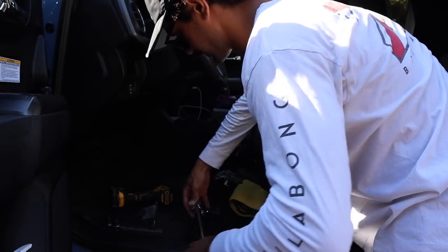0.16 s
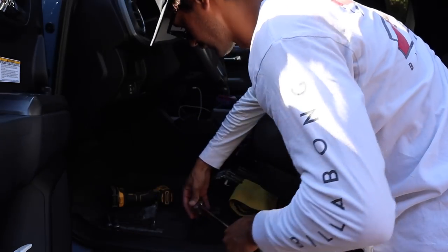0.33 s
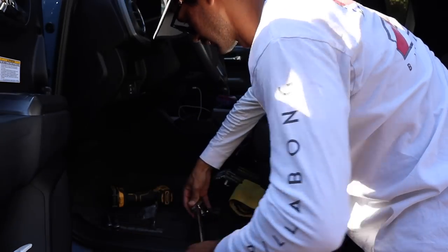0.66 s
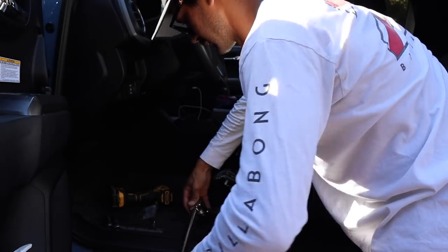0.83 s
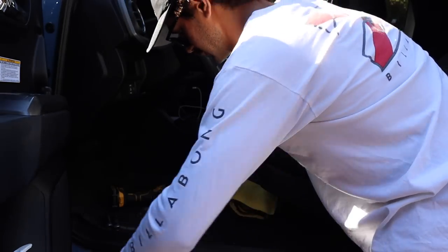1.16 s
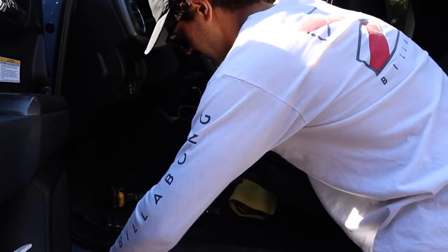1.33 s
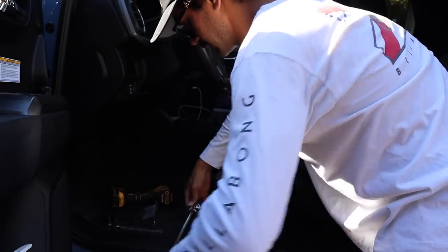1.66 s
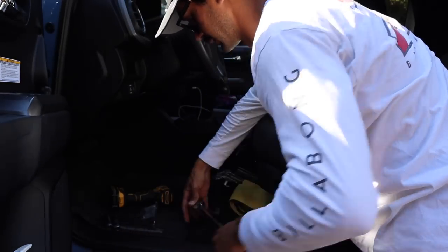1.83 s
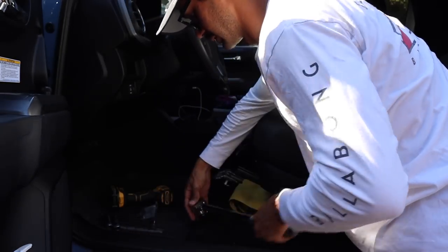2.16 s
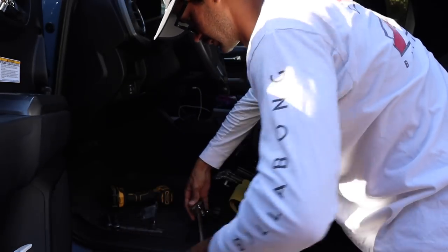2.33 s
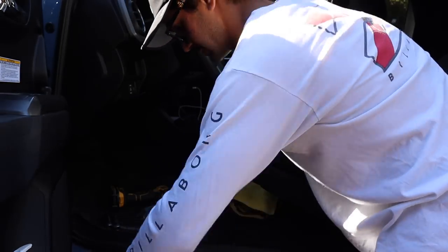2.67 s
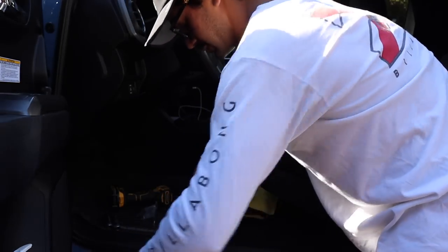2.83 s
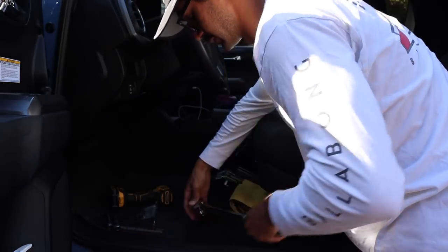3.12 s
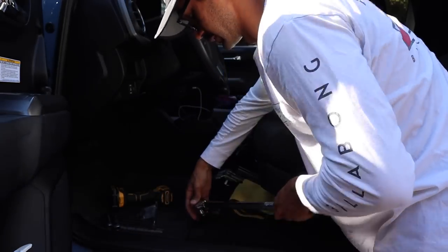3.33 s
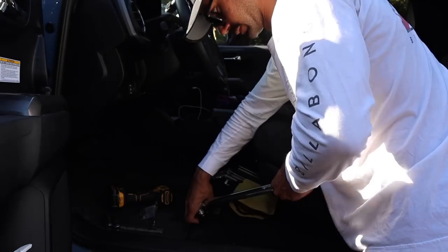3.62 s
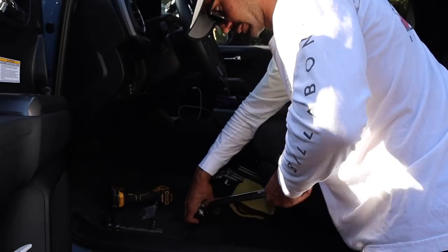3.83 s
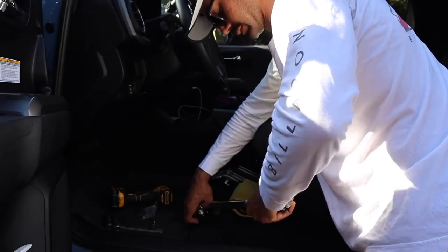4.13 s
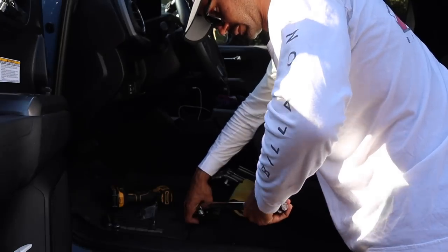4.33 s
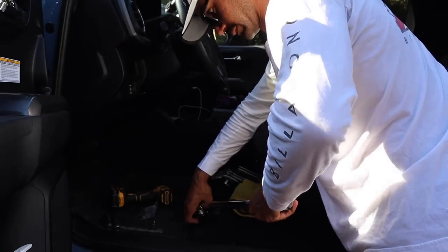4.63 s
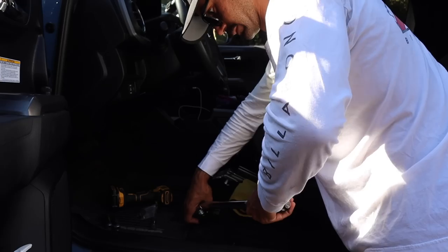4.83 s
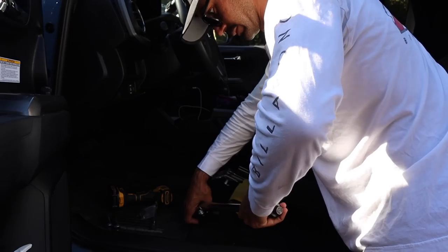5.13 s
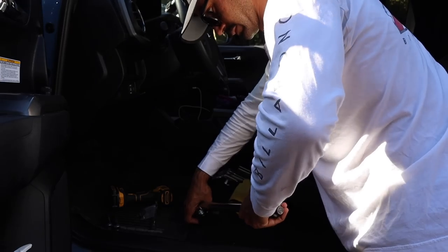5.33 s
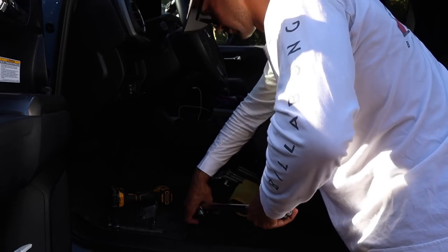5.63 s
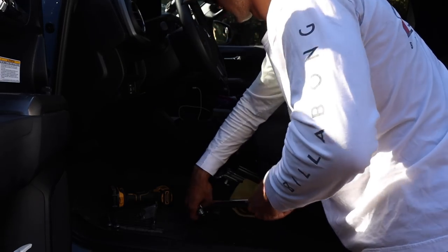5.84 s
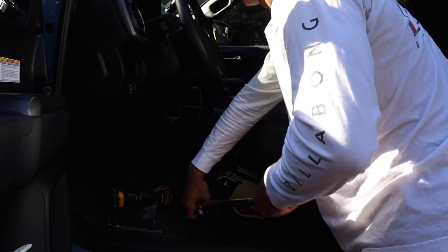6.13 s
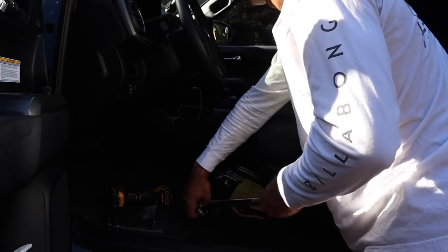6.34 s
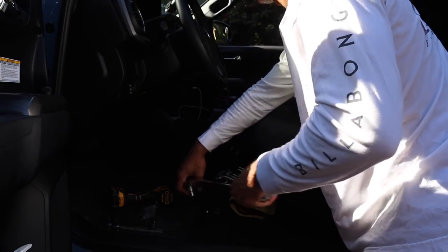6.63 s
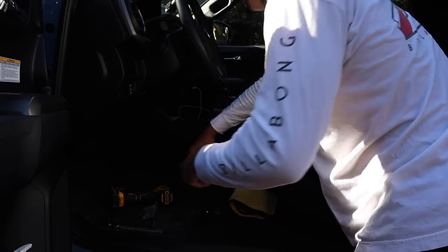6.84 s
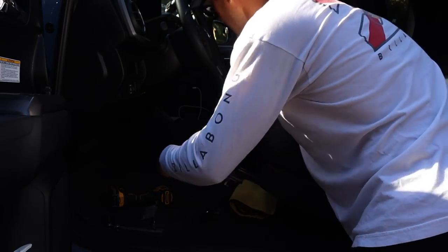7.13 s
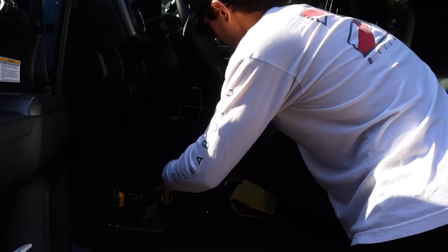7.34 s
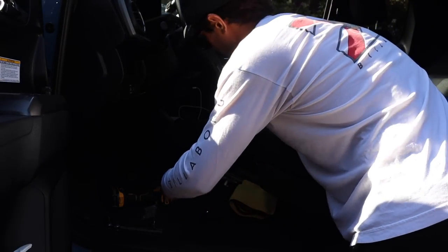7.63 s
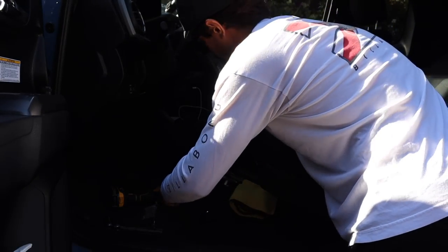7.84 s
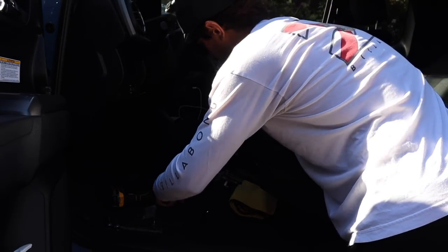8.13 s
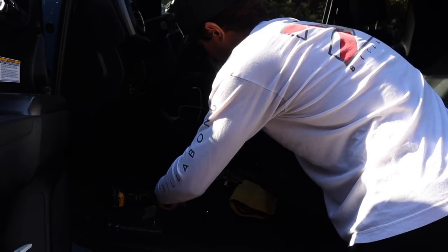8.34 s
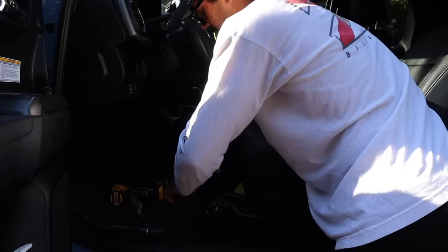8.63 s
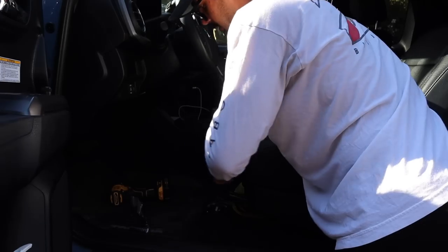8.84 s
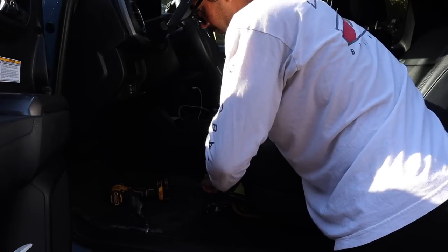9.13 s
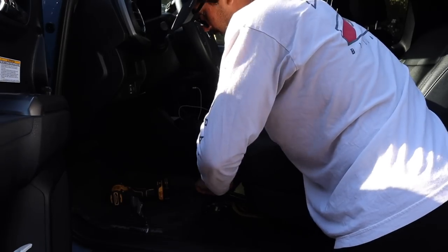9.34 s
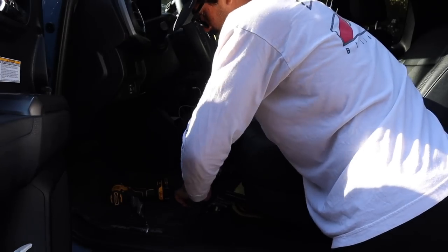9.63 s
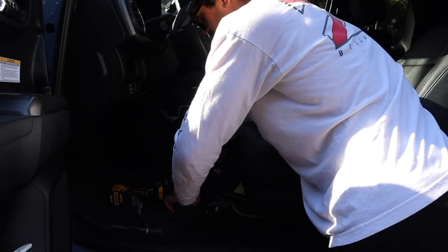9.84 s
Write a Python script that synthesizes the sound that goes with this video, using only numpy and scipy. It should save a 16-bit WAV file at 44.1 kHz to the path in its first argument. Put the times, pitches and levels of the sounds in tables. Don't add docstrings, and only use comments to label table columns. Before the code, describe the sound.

In an open vehicle cab, over a very quiet outdoor hum, a ratcheting torque wrench gives two separate clacks, then two quick runs of five. It snaps loudly twice, each followed by a duller reset. Cloth rustles, the seat creaks, and the tool and socket knock around with soft floor thuds. Two more ratchet teeth and a last hard snap end it. Close single microphone, dry.

```python
import sys
import numpy as np
from scipy import signal
from scipy.fft import rfft, irfft
from scipy.io import wavfile
from scipy.ndimage import map_coordinates

SR = 44100
rng = np.random.default_rng(int(sys.argv[2]) if len(sys.argv) > 2 else 0)


def unload_audio(sound):
    columns = np.transpose(np.atleast_2d(sound))
    steps = np.round(np.clip(columns, -1, 1) * 32767)
    wavfile.write(sys.argv[1], SR, steps.astype(np.int16))


def rack_gain(trim_db):
    fader = np.asarray(trim_db, float)
    return 10 ** (fader / 20)


N = 440118
SPAN = SR // 3

# f/Hz, level/dB per Hz
AIR = [(12, -52.5), (20, -10), (53, -12), (70, -5.5), (119, -7), (176, -8.5), (283, -16.5), (364, -17.5),
       (407, -19), (635, -21.5), (794, -14), (2950, -29), (15700, -35)]
# t/s, length/s, from f/Hz, to f/Hz, level/dB
CHIRPS = [
    (0.05, .08, 4850, 4900, -83),
    (0.735, .07, 4950, 4900, -83),
    (6.35, .13, 11300, 12100, -82),
    (6.57, .22, 11900, 12700, -82),
]

# sway, floor drone, seat creak, cloth level/dB
REST_DB = (-75.5, -70, -67, -80.5)
# t/s, sway level/dB, floor drone level/dB
SHAKES = [(0.14, -74, -62), (4.253, -41.5, -41.5), (4.66, -38.5, -43.5), (5.14, -40.5, -46.5),
          (5.55, -40, -46), (5.84, -59, -53.5), (5.979, -53, -45), (6.45, -58, -58), (7.72, -65, -48.5),
          (8.195, -57.5, -41.5), (8.7, -50, -50), (9.01, -51.5, -48), (9.18, -49, -44), (9.33, -44.5, -76),
          (9.92, -67, -39.5)]
# t/s, drone level/dB, rise/dB per s, fall/dB per s
SWINGS = [
    (2.11, -44.5, 48.5, 175),
    (3.22, -39.5, 87, 102),
]
# t/s, level/dB
CREAKS = [(0.0, -60), (0.3, -65), (1.78, -55), (2.0, -54), (2.14, -65), (3.062, -46), (3.28, -62),
          (3.36, -50), (4.42, -59), (6.3, -57.5), (8.56, -57.5), (8.7, -58), (9.15, -48)]
# f/Hz, level/dB per Hz
CREAK = [(82, -41.5), (140, -1), (246, -2.5), (433, -5), (538, -6.5), (596, -8), (1500, -24.5),
         (3000, -38.5), (3900, -55.5), (6600, -120)]
# t/s, level/dB, fade/dB per s
STROKES = [(0.37, -75, 11), (1.78, -92, 150), (1.92, -61, 56), (3.08, -65, 150.5), (3.22, -56, 102),
           (3.36, -72, 193), (4.42, -71.5, 29.5), (5.17, -76, 33.5), (6.7, -67.5, 23.5), (7.1, -67.5, 10.5),
           (7.55, -61, 22), (8.45, -70.5, 25), (8.81, -68, 53), (9.2, -65.5, 28.5), (9.75, -66, 12.5)]
# f/Hz, level/dB per Hz
CLOTH = [(900, -24), (2000, 0.5), (5000, -2), (8000, -6.5), (12000, -15.5), (15500, -17), (16000, -54.5)]
# t/s, level/dB, rise/dB per s, fall/dB per s
SWISHES = [
    (6.87, -72, 60, 100),
    (6.45, -83, 60, 60),
    (6.74, -78, 40, 60),
]
# f/Hz, level/dB per Hz
SWISH = [(6000, -20), (8000, -7), (10500, -9), (12500, 0), (13800, -6), (15500, -20)]

# t/s, steel level/dB
TICKS = [(0.0657, -59), (0.537, -67), (0.756, -59), (1.7, -52), (2.9555, -49), (6.025, -55), (6.41, -54.5),
         (6.976, -69), (7.018, -64), (7.122, -56.5), (7.336, -53), (8.744, -53.5), (9.017, -59),
         (9.2557, -60), (9.451, -56)]
# t/s, seat frame level/dB, floor pan level/dB
THUDS = [(1.147, -71, -56), (1.2856, -60, -49), (1.6075, -51, -42), (2.208, -51, -45.5), (2.4, -49, -49),
         (2.887, -46, -36), (5.797, -57, -45), (6.024, -71.5, -39.5), (6.206, -53, -46), (6.218, -46, -42),
         (6.377, -43.5, -47), (6.407, -42, -42.5), (8.099, -48.5, -44), (8.3043, -40.5, -37),
         (8.431, -71, -51), (8.47, -36.5, -34), (8.6311, -37, -30), (9.015, -65.5, -35.5),
         (9.053, -44.5, -37), (9.2016, -31.5, -59), (9.256, -47, -47.5), (9.4731, -50, -50.5)]

# t/s, level/dB
LIFTS = [(0.1314, -25), (0.313, -25.5), (1.7577, -24), (1.84, -22.5), (1.915, -27.5), (1.993, -26),
         (2.086, -25), (3.0285, -30), (3.1, -26.5), (3.167, -28), (3.244, -24), (3.3412, -29)]
# t/s, level/dB
LIFTS_SHORT = [
    (8.832, -29.5),
    (8.9562, -35.5),
    (9.1785, -29.5),
]
# t/s, level/dB
PINGS = [
    (0.131, -39),
    (9.178, -59),
]
# f/Hz, level/dB per Hz
TICK = [(1200, -2), (2700, -1.5), (5000, 8), (7100, -1), (9100, 7), (10500, 10), (13800, 2), (15900, -8),
        (17000, -47)]
TICK_SHORT = [(2500, -3), (4400, -5), (5200, 4.5), (6000, -19), (8000, -4), (10500, -3), (15900, -18),
              (17000, -46)]
# f/Hz, level/dB, t60/s
PAWL = [(9132, 0, .12)]

# t/s, clack level/dB, seat frame level/dB, pawl ring level/dB, lean to upper handle modes/dB
RATCHET = [(0.1487, -18, -30, 2.5, 4.5), (0.3266, -18.5, -28, -24, -3.5), (1.7619, -14.5, -29.5, 2.5, -7),
           (1.8457, -16.5, -28.5, -18, 2.5), (1.9209, -15, -30, -1, -4), (1.9998, -15.5, -31.5, -2, -4.5),
           (2.0962, -16, -30, -7, -6), (3.0346, -16, -29, -9, -8), (3.1058, -15, -32.5, -3, -1.5),
           (3.1735, -15.5, -25, 0.5, 3.5), (3.2515, -16.5, -25, -7, -7.5), (3.3536, -17.5, -30, -2, -6.5)]
RATCHET_SHORT = [
    (8.8397, -22.5, -22.5, -10, -8),
    (8.9724, -22, -22, -5, 2),
]
# f/Hz, level/dB per Hz
CRACK = [(900, -33.5), (2200, -5.5), (3300, -7.5), (4400, -4), (5300, -4.5), (6600, -8.5), (8200, -2),
         (10500, -7.5), (13000, -6), (15500, -17.5), (17000, -34)]
CAB = [(700, -19), (2000, -0.5), (3400, 1), (5300, 9), (6700, -18), (8800, -16), (11000, -21),
       (16500, -36.5)]
# f/Hz, level/dB, t60/s
HANDLE = [(2450, -8, .1), (3090, -7, .09), (3285, 0, .08), (3560, -5, .07), (4450, -6, .08), (4980, -6, .1),
          (5270, -2, .13), (5700, -7, .1), (8060, -2, .08), (9950, -7, .06), (13100, -6, .045)]
HANDLE_SHORT = [(1640, -10, .1), (1920, -6, .16), (2480, -11, .12), (4030, -14, .08), (5120, -2, .07),
                (5230, -1, .13), (8100, -9, .06), (10900, -12, .05), (12600, -14, .06)]
# f/Hz, level/dB, t60/s
BRACKET = [(1377, 0, 0.13), (1690, 7, 0.11), (2010, 2.5, 0.097), (2140, 1.5, .07), (2394, -4.5, 0.14),
           (2670, -12, 0.11), (3290, -2, 0.066)]
FRAME = [(499, -10.5, 0.055), (580.7, 2.5, 0.051), (732.4, -0.5, 0.066), (833.4, -3, 0.056),
         (906, -10.5, 0.11), (1151, -4, 0.05)]
PAN = [(112, -12, 0.15), (154, -11, 0.42), (200.8, 2.5, 0.15), (245.3, 0.5, 0.13), (300, 5, 0.045),
       (355, -4, 0.056), (520, -10, 0.046)]

# t/s, level/dB
RAPS = [
    (0.1487, -19),
    (8.485, -31.5),
    (8.9724, -29),
    (8.8397, -23.5),
]
# f/Hz, level/dB, t60/s
GRIP = [(5080, 3.5, 0.041), (5330, 3, 0.036), (5430, -11.5, 0.024)]
# t/s, f/Hz, level/dB, t60/s
ACCENTS = [(0.1487, 3300, -26, 0.034), (1.761, 9300, -37, .06), (2.0015, 9330, -29, .06),
           (3.1053, 3200, -31, .08), (3.174, 3310, -33, 0.12), (3.3526, 8140, -22, 0.022),
           (3.3532, 9700, -23, 0.024), (3.3536, 5300, -23, 0.036), (4.227, 3986, -34, 0.2),
           (5.1023, 7720, -16, 0.042), (5.1032, 9900, -22, .05), (5.1023, 1908, -20, 0.062),
           (5.1007, 4170, -45, 0.24), (5.523, 889, -30, 0.15), (4.63, 764, -28, 0.075),
           (5.928, 800, -28.5, .1), (6.982, 3960, -61, 0.04), (8.8397, 1975, -36, 0.17),
           (8.9724, 5260, -20, 0.019), (8.9724, 5200, -49, 0.22), (9.892, 8240, -22.5, .06),
           (9.891, 5660, -32, .05), (9.891, 6500, -32, 0.1), (9.891, 1650, -27, 0.076),
           (9.891, 823, -28.5, .11),
           (0.3264, 5240, -30, .05), (.3266, 12860, -29, .035), (2.859, 8130, -44, .04),
                (2.9, 12700, -53, .025), (2.9, 5600, -48, .02), (3.356, 1150, -34.5, 0.07),
                (4.229, 907, -24, 0.072), (4.229, 1210, -23, 0.065), (4.228, 5590, -21, 0.051),
                (0.1489, 5300, -39.5, 0.19), (5.105, 580, -22.5, 0.089), (5.1025, 13000, -23, .035),
                (6.486, 6000, -45.5, 0.035), (5.93, 1150, -30, .07), (7.719, 248, -26, 0.12),
                (7.719, 112, -35, 0.16), (8.179, 565, -25, .08), (8.179, 1194, -29.5, .08),
                (8.487, 263, -27, 0.084), (8.487, 640, -28, .08), (8.975, 780, -25, .06),
                (9.184, 199, -26, 0.097), (9.894, 487, -14, .06)]

# t/s, steel level/dB, bracket level/dB, seat frame level/dB, floor pan level/dB
KNOCKS = [(0.6749, -54.5, -56.5, -40, -45), (1.6436, -48, -45, -43.5, -43), (2.274, -48.5, -46, -38, -39),
          (2.859, -33, -53, -29, -36.5), (2.8994, -45.5, -58, -39.5, -38), (5.928, -28, -24.5, -22, -30),
          (6.251, -54, -49, -43.5, -43), (6.469, -62, -41, -36, -46), (6.4853, -30.5, -28, -31, -45),
          (7.7154, -49, -26.5, -20, -32), (7.7235, -33.5, -30, -31, -29), (7.7954, -66, -51.5, -39, -38.5),
          (7.8993, -53, -57, -45.5, -45.5), (8.1768, -22, -24.5, -19.5, -14.5), (8.324, -48, -39, -38, -35),
          (8.4839, -26, -30, -25.5, -25.5), (8.582, -53, -51, -38, -34.5), (8.6189, -57, -47, -34.5, -39),
          (8.6458, -47, -40.5, -29, -53), (8.7152, -58, -51.5, -38.5, -35), (9.1067, -57, -56, -46, -39),
          (9.1753, -29.5, -41, -27.5, -34), (9.182, -47, -36.5, -40, -25), (9.366, -60, -71, -49, -41.5)]
DULL_CRACK = CRACK[:8] + [(12500, -8), (15500, -24), (17000, -40)]

# t/s, steel level/dB, seat frame level/dB, floor pan level/dB, push direction +-1
CLICKS = [
    (4.227, -6, -11, -9, 1),
    (4.6299, -19.5, -20.5, -13.5, -1),
    (5.1022, -7, -16, -11, 1),
    (5.523, -20.5, -21.5, -13, -1),
    (9.891, -11, -17.5, -11, -1),
]
JOLT_LAG_S = [0.0012, 0.00045, .0012, 0.00028, 0.00145]
# f/Hz, level/dB, t60/s
TUBE = [(3950, -6, .28), (4170, -6.5, .36), (4730, -9, .16), (5750, -6, .22), (7550, -4, .18),
        (7990, -2, .22), (9140, -6, .11), (9770, -3, .17), (10050, -2, .18), (13800, -8, .08)]
BREAK = [(1894, 1, .07), (2510, -10, 0.033), (3570, -3.5, 0.051), (4070, -1, 0.091), (5500, -4.5, 0.061),
         (5860, -4, 0.074), (7820, 1.5, 0.039), (7685, -4.5, 0.068), (9340, -4.5, .06), (9900, -6, 0.055)]
RESET = [(1410, -17, 0.072), (1735, -1.5, 0.17), (1980, -6.5, .05), (2290, -10, .09), (2670, -12, .09),
         (3300, 0, 0.054), (3660, 4, 0.039), (4780, -11, 0.11), (5300, -6, 0.054), (6850, -11, 0.069)]
# f/Hz, level/dB, t60/s
LOADED_FRAME = [(483.6, -6.5, 0.031), (599, 3.5, 0.048), (696, -3, 0.052), (766, -3.5, 0.058),
                (894, -0.5, 0.11), (1045, -6, 0.023), (1150, -4.5, 0.058)]
LOADED_PAN = [(111, -13, 0.25), (160, -15.5, .35), (198.4, 1.5, 0.17), (246, 0, .11), (333, -1, .09),
              (388, -10, .25), (439.7, -10.5, 0.14)]

# t/s, hold/s, level/dB, bite/dB per s, release/dB per s
SCUFFS = [(6.475, 0.011, -53, 400, 497), (6.84, 0.042, -45.5, 263, 584), (6.886, 0.0038, -47.5, 880, 700),
          (8.645, 0.0052, -70, 302, 450), (8.475, .008, -53.5, 500, 698), (8.59, 0.026, -57.5, 696, 300),
          (8.66, 0.0063, -60.5, 500, 500), (9.11, 0.037, -59.5, 500, 401)]
# f/Hz, level/dB per Hz
SCUFF = [(300, -40), (420, -9), (600, -3), (880, 0), (1150, -3), (1900, -14), (3200, -13), (5000, -23),
         (8000, -27), (15500, -39)]

# t/s, level/dB
SEATINGS = [
    (7.725, -25),
]
# f/Hz, level/dB, t60/s
SOCKET = [(3100, -10, .06), (4480, 0.5, 0.039), (5400, -7, .03), (7760, -1, 0.017)]


def unit(x):
    return x / np.sqrt(np.mean(x ** 2, -1, keepdims=True) + 1e-20)


def coloured(shape, spectrum, tilt_db=0):
    hz = np.fft.rfftfreq(shape[-1], 1 / SR) + 1
    f, db = np.transpose(spectrum)
    tilt = tilt_db * np.log2(np.maximum(hz / 3500, 1))
    gain = rack_gain(np.interp(np.log(hz), np.log(f), db, -120, -120) + tilt)
    return unit(irfft(rfft(rng.standard_normal(shape)) * gain, shape[-1]))


def wobble(rate):
    knots = rng.standard_normal(int(N * rate / SR) + 4)
    return map_coordinates(knots, [np.arange(N) * rate / SR])


def swells(times, db, rise, fall, rest_db=-120):
    t = np.arange(0, N + 64, 64)[:, None] / SR
    drop = np.where(t < times, (times - t) * rise, (t - times) * fall)
    gain = np.sqrt(rack_gain(rest_db) ** 2 + np.sum(rack_gain(db - drop) ** 2, 1))
    return np.interp(np.arange(N) / SR, t[:, 0], gain)


def placed(rows, times, db):
    out = np.zeros(N + SPAN)
    for row, s, gain in zip(rows, times, rack_gain(db)):
        out[round(s * SR):][:SPAN] += gain * row / np.abs(row).max()
    return out[:N]


def crack(count, spectrum, tilt_db, rise, t60, tail_db, tail_t60, cab_spectrum=None):
    t = np.arange(SPAN) / SR
    wall = rack_gain(tail_db - 9) * np.exp(-((t - 0.052) / 0.009) ** 2)
    spike_gain = 3.5 * rack_gain(-60 * t / 0.012) + wall
    spike = spike_gain * coloured((count, SPAN), spectrum, tilt_db + 2)
    after = rack_gain(-60 * t / t60) * coloured((count, SPAN), spectrum, tilt_db - 3.5)
    cab_tilt_db = 0 if cab_spectrum else 0.6 * tilt_db - 10.5
    cab = rack_gain(tail_db - 60 * t / tail_t60) * coloured((count, SPAN), cab_spectrum or spectrum, cab_tilt_db)
    return (spike + after + cab) * (1 - np.exp(-(t / rise) ** 2))


def struck(count, modes, arrive, loose, wash_db, punch=0.17, drift=0.032, wander=0, stiff=1,
           scatter_db=8.0, lean_db=0):
    t = np.arange(SPAN) / SR
    out = np.zeros((count, SPAN))
    for hz, db, t60 in modes:
        level, detune, turn = rng.standard_normal((count, 3)).T[:, :, None]
        late = arrive * (200 / hz) ** 0.3213
        after = np.abs(t - late) / t60
        shape = rack_gain(-60 * after) + punch * rack_gain(-350 * after)
        shape = shape * (1 - np.exp(-(t / late) ** 4))
        phase = loose * turn
        if np.any(wander):
            phase = phase + wander * np.cumsum(rng.standard_normal(out.shape), 1)
        gain = rack_gain(db + scatter_db * level + lean_db * np.sign(hz - 4000))
        pitch = hz * stiff * (1 + drift * detune)
        out += gain * shape * np.cos(2 * np.pi * pitch * (t - late) + phase)
    band = [(modes[0][0] * 0.45, -40)] + [m[:2] for m in modes] + [(modes[-1][0] * 2.6, -40)]
    wash = coloured(out.shape, band, -8) * rack_gain(wash_db - 60 * t / 0.22) * (1 - np.exp(-t / 0.0011))
    return out / np.abs(out).max(1, keepdims=True) + wash


def outdoors():
    air = rack_gain(-64.5 + 0.45 * wobble(3.6)) * coloured((N,), AIR + [(15950, -65.5)])
    whine = rack_gain(-89.5) * coloured((N,), [(14500, -49.0), (14800, -11.0), (14900, -2.5), (15200, -50.0)])
    return air + whine


def seat_creaks():
    s, db = np.transpose(CREAKS)
    lumps = rack_gain(2.5 * wobble(45))
    return swells(s, db, 131, 131, REST_DB[2]) * lumps * coloured((N,), CREAK)


def cab_shake():
    s, sway_db, drone_db = np.transpose(SHAKES)
    rise, fall = 349, 110
    sway_level = swells(s, sway_db - 3, rise, fall, REST_DB[0])
    sway = sway_level * coloured((N,), [(20, -40), (32, -12), (41, 0), (50, -13), (75, -32)])
    jolted = swells(s, drone_db, rise, fall, REST_DB[1])
    floor = np.hypot(jolted, swells(*np.transpose(SWINGS)))
    drone = floor * coloured((N,), [(60, -46.0), (82, 0.5), (106, 6.0), (125, 3.5), (170, -61.0)])
    return sway + drone


def clothing():
    s, db, fade = np.transpose(STROKES)
    rustle = rack_gain(1.5 * wobble(60) - 6)
    sleeves = swells(s, db, fade, fade, REST_DB[3]) * rustle * coloured((N,), CLOTH)
    return sleeves + swells(*np.transpose(SWISHES)) * coloured((N,), SWISH)


def chirps():
    t, out = np.arange(N) / SR, 0
    for s, length, from_hz, to_hz, db in CHIRPS:
        u = np.clip((t - s) / length, 0, 1)
        hz = from_hz + (to_hz - from_hz) * np.sqrt(u) + 260 * wobble(600)
        level = rack_gain(db + 8.4 * wobble(60)) * np.sin(np.pi * u) ** 0.5
        out = out + level * np.sin(2 * np.pi * np.cumsum(hz) / SR)
    return out


def bumps(s, frame_db, pan_db):
    frame = struck(len(s), FRAME, 0.00613, 1.56, -12.5, drift=0.05, wander=0.043, scatter_db=2.5)
    pan = struck(len(s), PAN, 0.00482, 1.0, -9.0, punch=3.3, drift=0.057, scatter_db=6.0)
    return placed(frame, s, frame_db) + placed(pan, s, pan_db)


def fumbling():
    s, tick_db = np.transpose(TICKS)
    ticks = placed(crack(len(s), CRACK, -7.5, 0.0013, 0.076, -24, 0.052), s, tick_db)
    return ticks + bumps(*np.transpose(THUDS))


def pawl_note(times, db):
    note = struck(len(times), PAWL, 0.004, 3, -60, punch=0.1, drift=0.001, wander=0.015)
    return placed(note, times, db)


def lift_offs():
    s, db = np.transpose(LIFTS)
    free = placed(crack(len(s), TICK, 0, 0.00051, 0.056, -32.5, 0.12), s, db)
    notes = pawl_note(s, db - 25) + pawl_note(*np.transpose(PINGS))
    s, db = np.transpose(LIFTS_SHORT)
    short = placed(crack(len(s), TICK_SHORT, 0, 0.0014, 0.039, -33, 0.15), s, db)
    return free + notes + short


def ratchet(teeth, handle, tilt_db, handle_db, bracket_db):
    s, clack_db, frame_db, ring_db, lean_db = np.transpose(teeth)
    n = len(s)
    clack = placed(crack(n, CRACK, tilt_db, 0.00088, 0.056, -26.5, 0.32, CAB), s, clack_db)
    rough = struck(n, handle, 0.003, 3, -29, punch=2.2, drift=0.008, wander=0.19, scatter_db=2.5,
                   lean_db=lean_db[:, None])
    ring = placed(rough, s, clack_db + handle_db) + pawl_note(s, clack_db + ring_db - 23)
    bracket = struck(n, BRACKET, 0.00636, 0.65, -11, wander=0.065, scatter_db=4.0)
    bracket = placed(bracket, s, clack_db + bracket_db)
    frame = placed(struck(n, FRAME, 0.00683, 3.04, -13, scatter_db=3), s, frame_db)
    pan = placed(struck(n, PAN, 0.00546, 1.7, -0.44), s, frame_db - 11)
    return clack + ring + bracket + frame + pan


def raps():
    s, db = np.transpose(RAPS)
    grip = struck(len(s), GRIP, 0.004, 3.4, -37, punch=1.6, drift=0.005, wander=0.11, scatter_db=4.5)
    return placed(grip, s, db)


def accents():
    s, hz, db, t60 = np.transpose(ACCENTS)
    khz = hz[:, None] / 1000
    note = struck(len(s), [(1000, 0, t60[:, None])], 0.003, 3, -80, punch=0.5, drift=0,
                  wander=0.025 + 0.015 * khz, stiff=khz)
    return placed(note, s, db)


def knocks():
    s, steel_db, bracket_db, frame_db, pan_db = np.transpose(KNOCKS)
    n = len(s)
    tilt_db = -11 + 0.18 * (steel_db[:, None] + 24.0)
    steel = placed(crack(n, DULL_CRACK, tilt_db, 0.0017, 0.076, -20.5, 0.29), s, steel_db)
    bracket = struck(n, BRACKET, 0.00513, 3.2, -16.0, drift=0.035, wander=0.12, scatter_db=3)
    return steel + placed(bracket, s, bracket_db) + bumps(s, frame_db, pan_db)


def torque_clicks():
    s, steel_db, frame_db, pan_db, push = np.transpose(CLICKS)
    n = len(s)
    push = np.sign(push)[:, None]
    hard = steel_db > -15
    tilt_db = (0.8 * (steel_db + 6) - 1.5)[:, None]
    slip_lead = np.array([0.0015, 0.00044, 0.004, 0.003, 0.0011])
    slip = placed(crack(n, CRACK, tilt_db, 0.00035, 0.034, -28.0, 0.1), s - slip_lead, steel_db - 14.0)

    rise = np.where(hard, 0.0016, 0.0007)[:, None]
    tail_db = np.where(hard, -24.5, -15)[:, None]
    slam = placed(crack(n, CRACK, tilt_db, rise, 0.06, tail_db, 0.34), s, steel_db - 3.5)

    tube = struck(n, TUBE, 0.004, 3, -27, punch=1.5, drift=0.003, wander=0.13, scatter_db=1.5)
    ring = placed(tube, s, 1.9 * steel_db - 8.5)
    for modes, pick, head_db in ((BREAK, hard, -5), (RESET, ~hard, -1)):
        head = struck(pick.sum(), modes, 0.004, 3, -30, punch=1.5, drift=0.004, wander=0.1, scatter_db=1.5)
        ring = ring + placed(head, s[pick], steel_db[pick] + head_db)

    bracket = placed(struck(n, BRACKET, 0.011, 2.9, -15.5, wander=0.1), s, pan_db - 12.5)
    frame = struck(n, LOADED_FRAME, 0.007, 0.5, -16.0, punch=0.46, drift=0.012, wander=0.052, scatter_db=2.3)
    frame = placed(frame * push, s + JOLT_LAG_S, frame_db)

    stiff = np.where(s > 9, 1.21, 1)[:, None]
    jolt = struck(n, LOADED_PAN, 0.0062, 0.25, -13.5, punch=3.5, drift=0.01, wander=0.008,
                  stiff=stiff, scatter_db=1.2)
    pan_highpass = signal.butter(2, 98, "highpass", fs=SR, output="sos")
    jolt = signal.sosfiltfilt(pan_highpass, jolt, padlen=0)
    pan = placed(jolt * push, s + JOLT_LAG_S, pan_db)
    return slip + slam + ring + bracket + frame + pan


def scuffs():
    t = np.arange(N) / SR
    level = np.zeros(N)
    for s, hold, db, bite, release in SCUFFS:
        drop = np.maximum(bite * (s - t), release * (t - s - hold))
        level += rack_gain(db - np.maximum(drop, 0))
    grit = rack_gain(1.3 * wobble(250))
    return level * unit(grit * coloured((N,), SCUFF))


def seatings():
    s, db = np.transpose(SEATINGS)
    ring = struck(len(s), SOCKET, 0.00296, 4.3, -41.5, punch=2.2, drift=0.0034, wander=0.11, scatter_db=0)
    return placed(ring, s, db)


def scene():
    surroundings = outdoors() + seat_creaks() + cab_shake() + clothing() + chirps()
    free_teeth = ratchet(RATCHET, HANDLE, -0.36, -4.0, -17.0)
    short_teeth = ratchet(RATCHET_SHORT, HANDLE_SHORT, 0.47, 3.0, -10.0)
    wrench = lift_offs() + free_teeth + short_teeth + raps() + accents() + torque_clicks()
    handling = fumbling() + knocks() + scuffs() + seatings()
    return (surroundings + wrench + handling)[None]


def low_pass(x):
    return signal.sosfilt(signal.butter(12, 16800, fs=SR, output="sos"), x)


def record(dry):
    low_cut = signal.butter(2, 32, "highpass", fs=SR, output="sos")
    high_cut = signal.cheby1(9, 0.5, 15850, fs=SR, output="sos")
    mix = signal.sosfilt(high_cut, signal.sosfilt(low_cut, dry))
    return low_pass(mix)


dry = scene()
out = record(dry)
unload_audio(out)
```